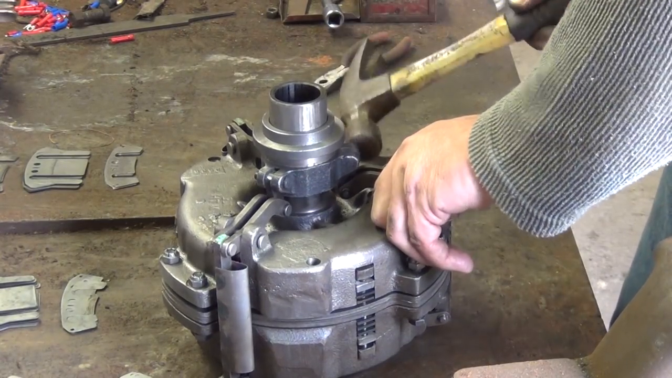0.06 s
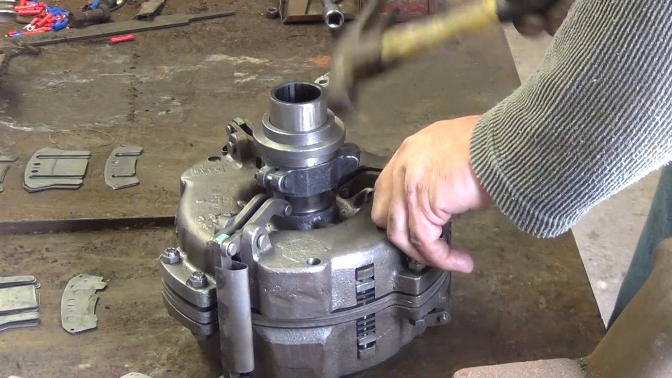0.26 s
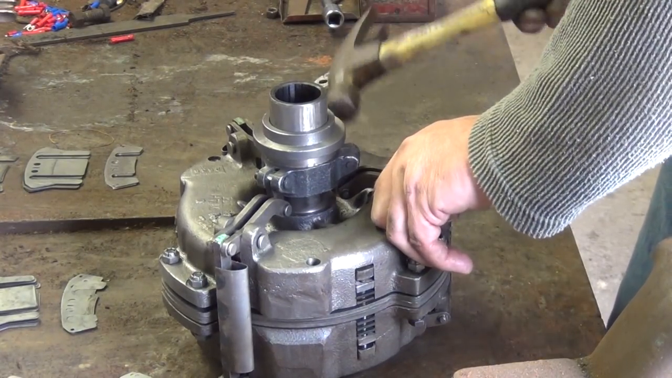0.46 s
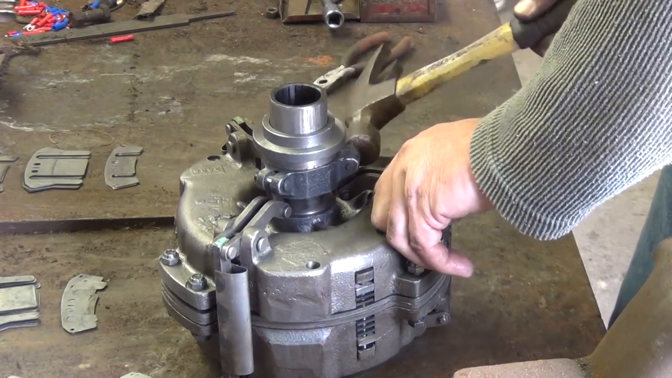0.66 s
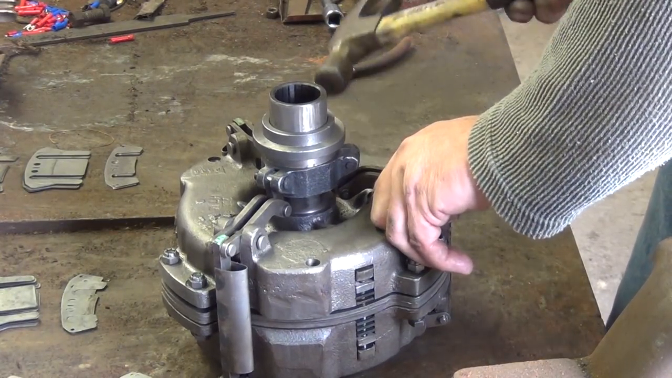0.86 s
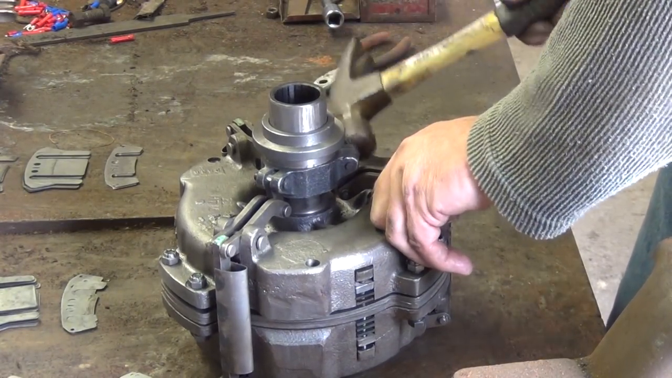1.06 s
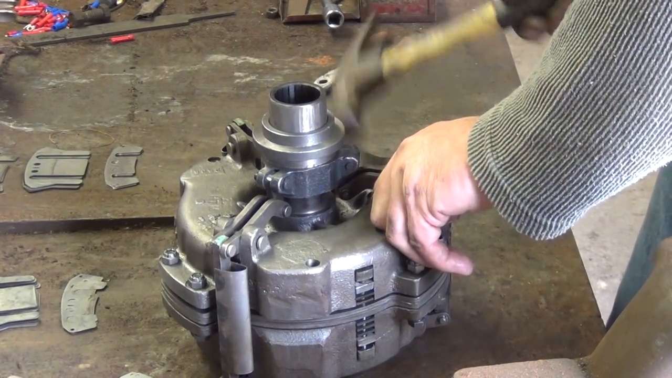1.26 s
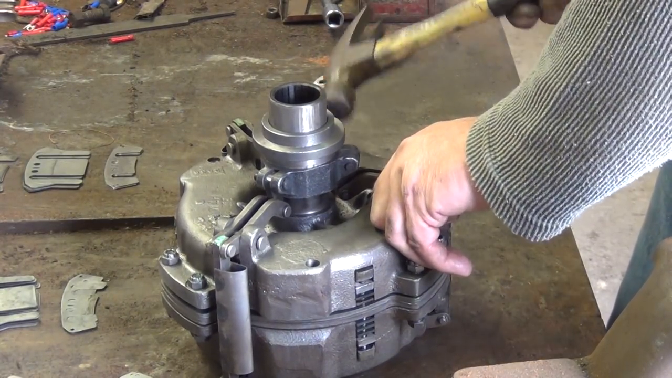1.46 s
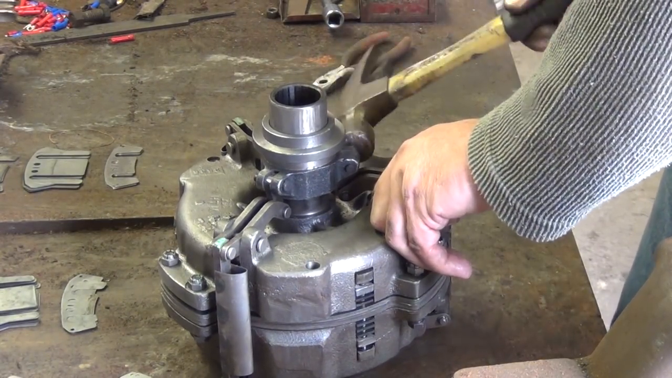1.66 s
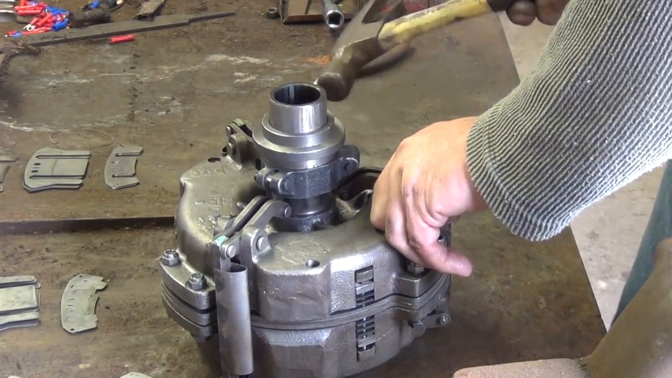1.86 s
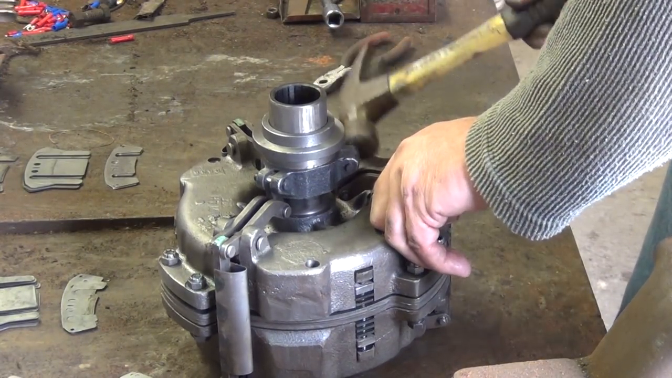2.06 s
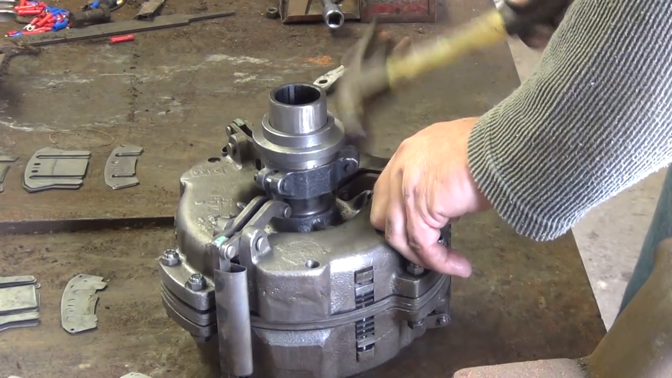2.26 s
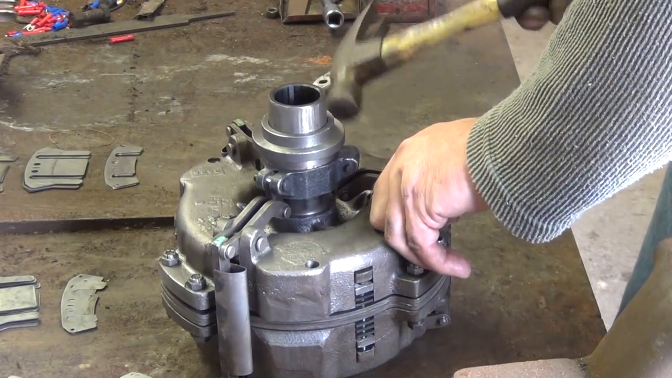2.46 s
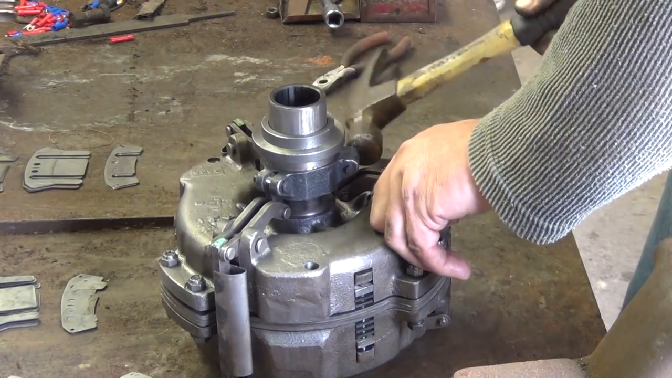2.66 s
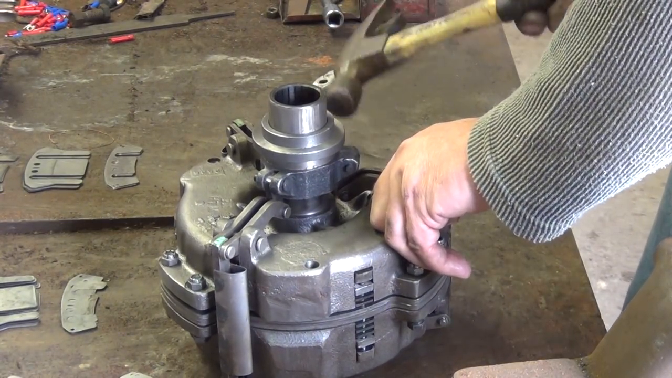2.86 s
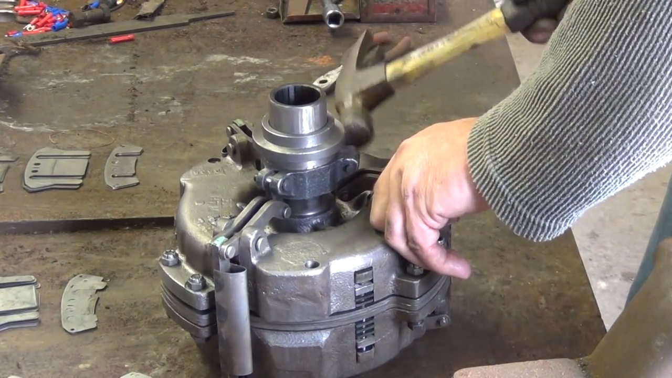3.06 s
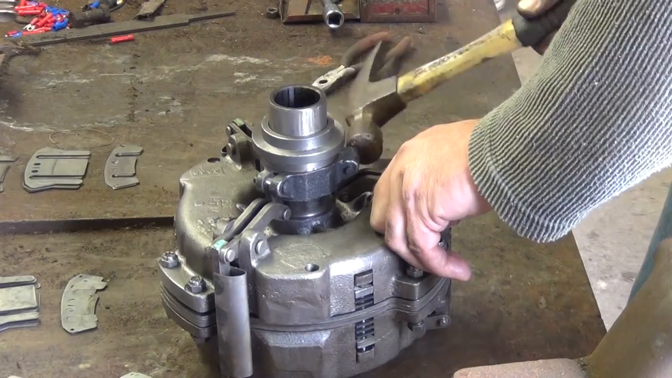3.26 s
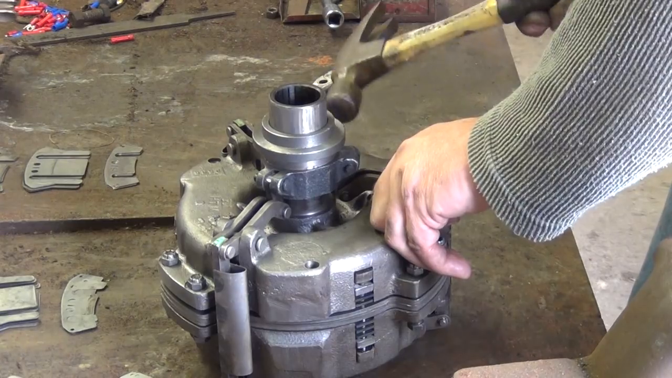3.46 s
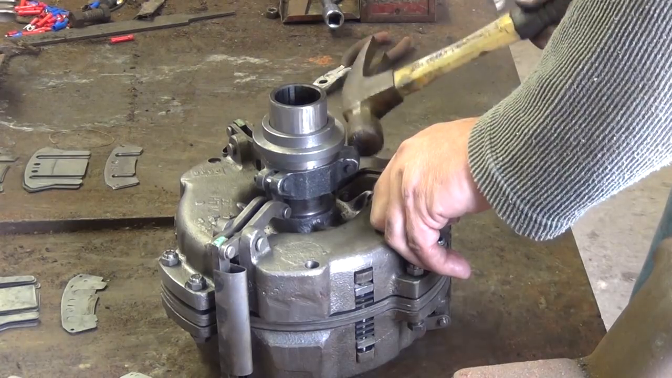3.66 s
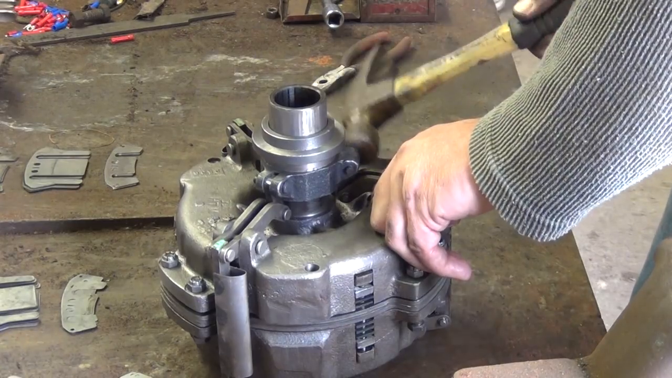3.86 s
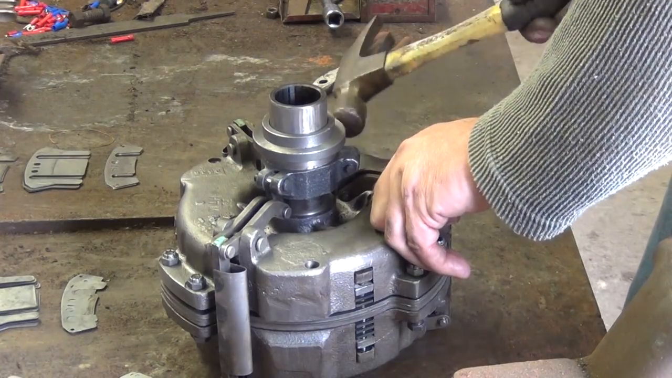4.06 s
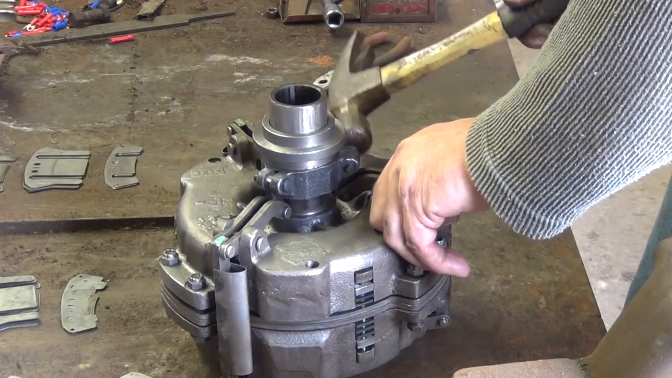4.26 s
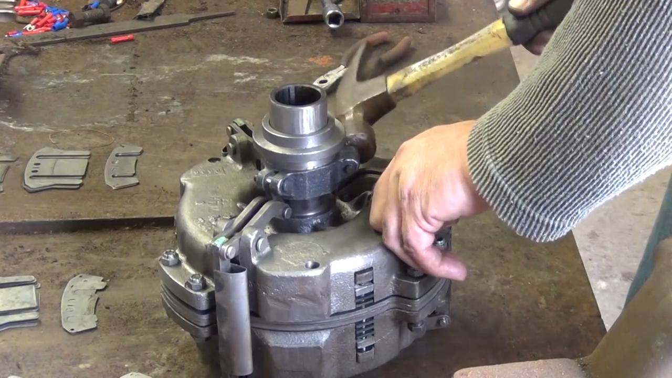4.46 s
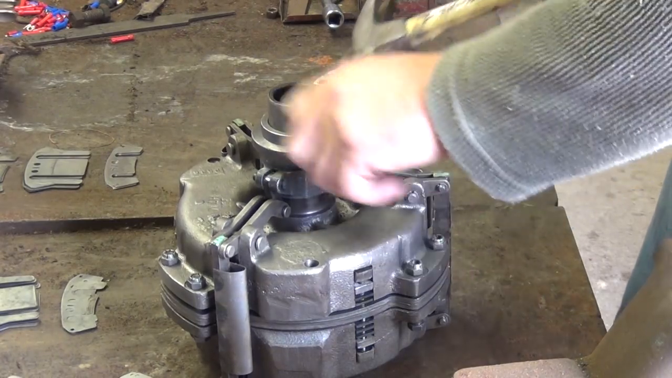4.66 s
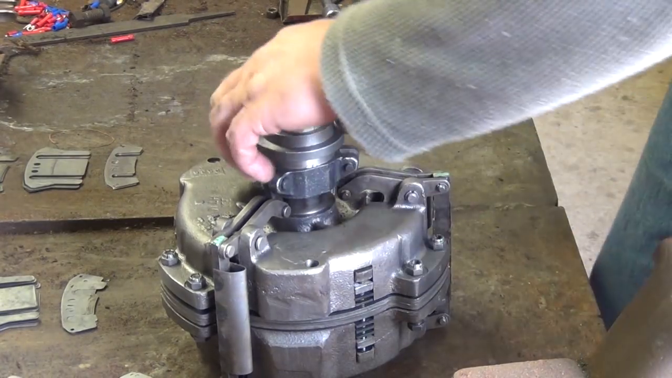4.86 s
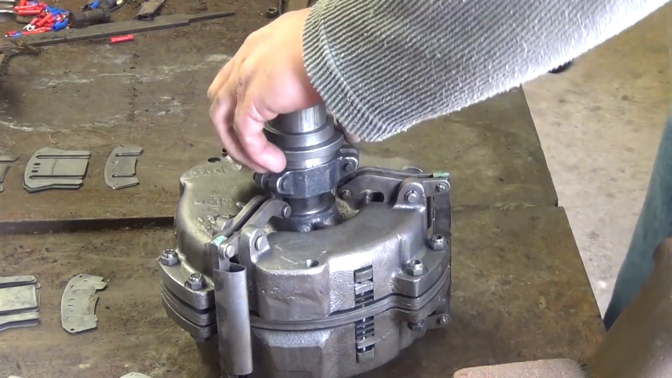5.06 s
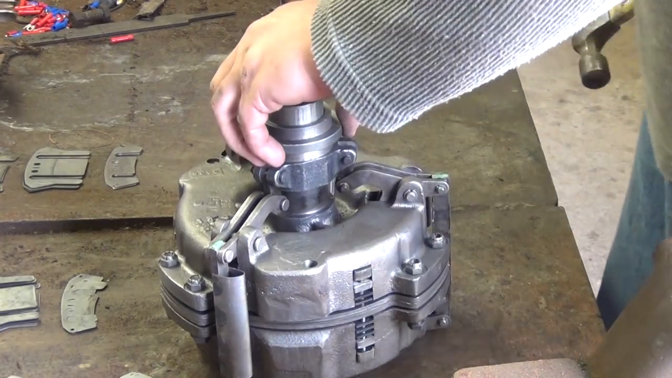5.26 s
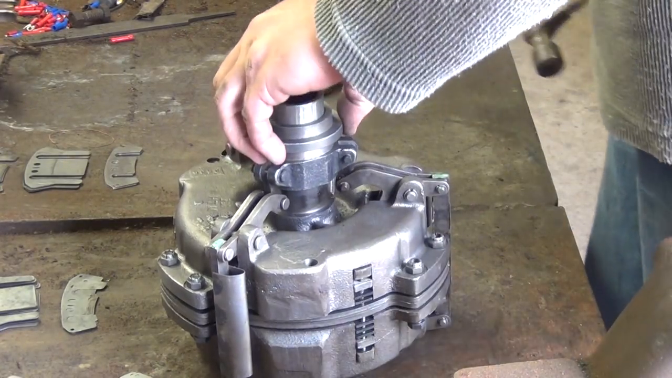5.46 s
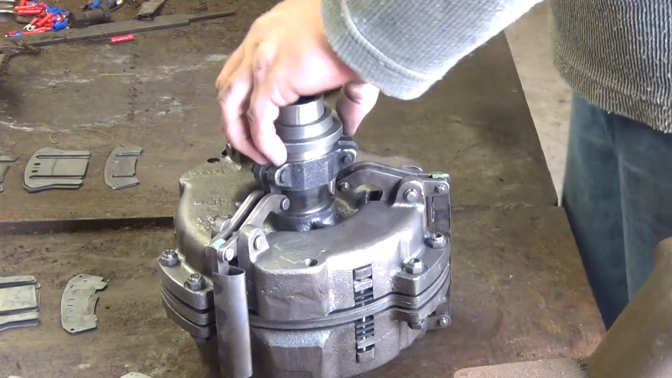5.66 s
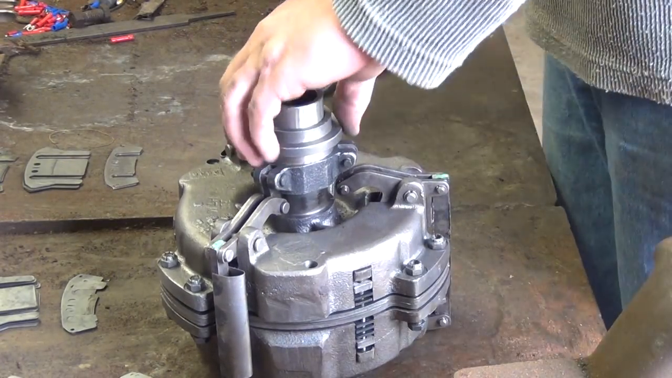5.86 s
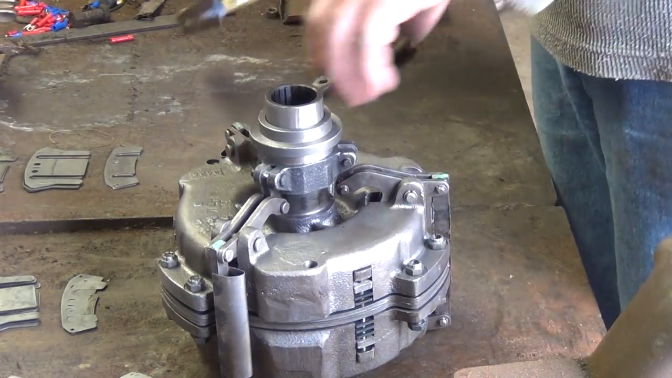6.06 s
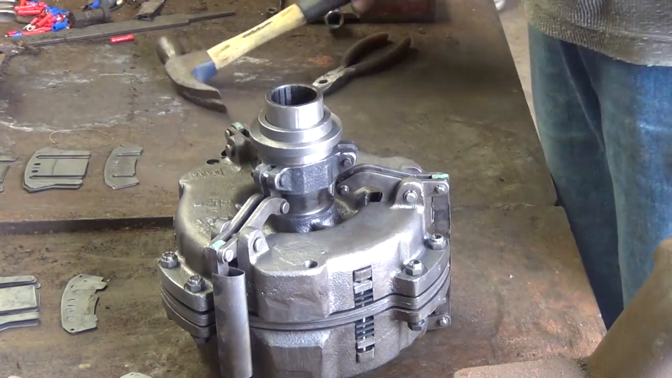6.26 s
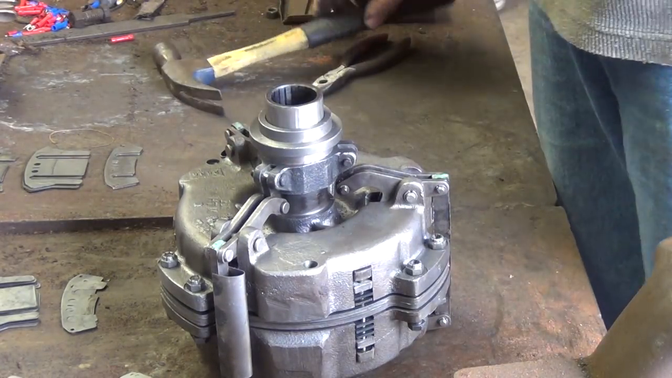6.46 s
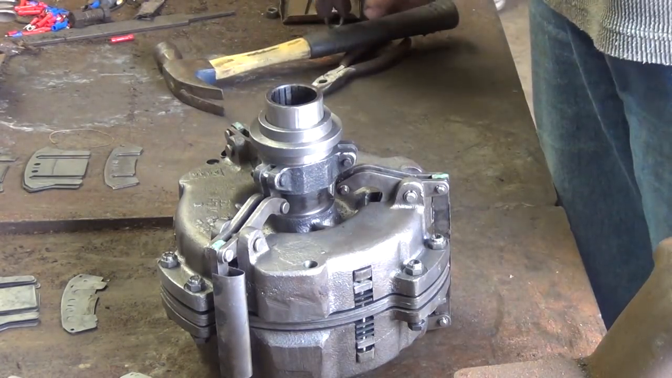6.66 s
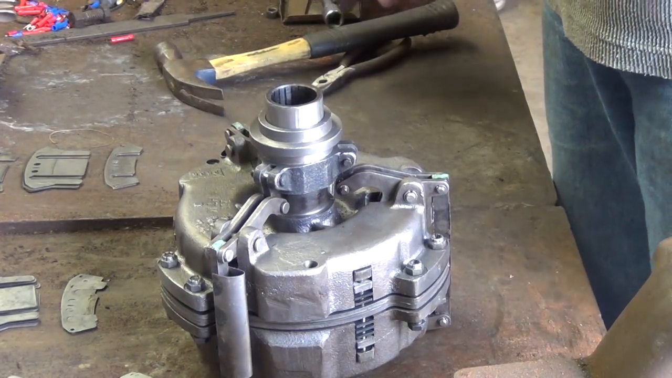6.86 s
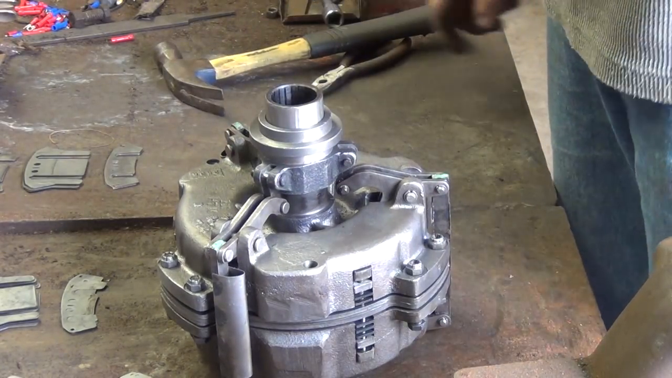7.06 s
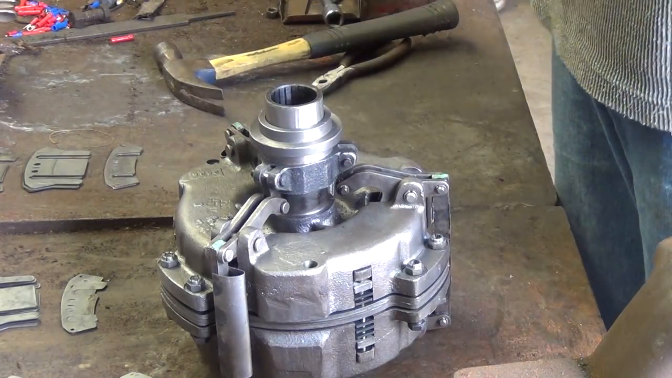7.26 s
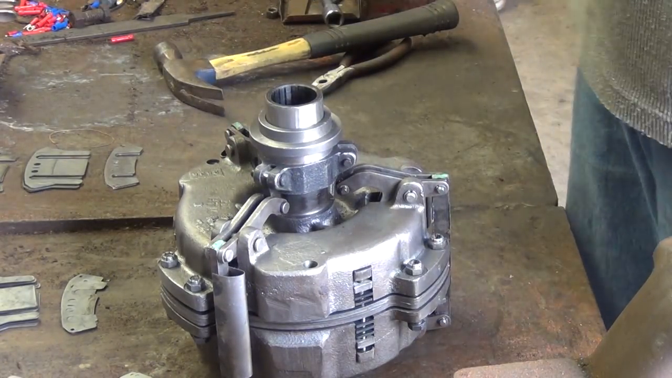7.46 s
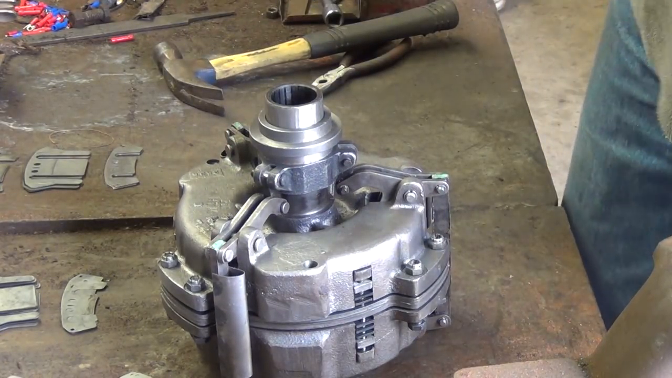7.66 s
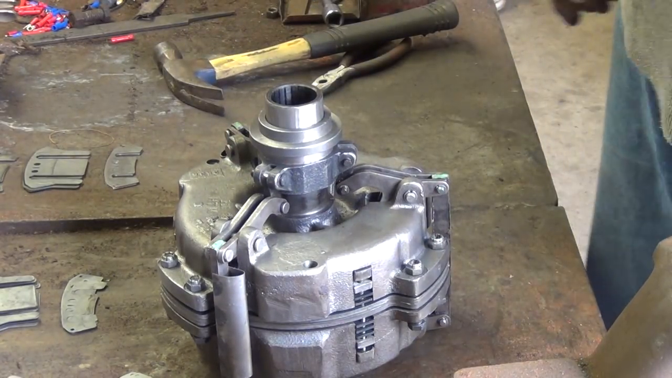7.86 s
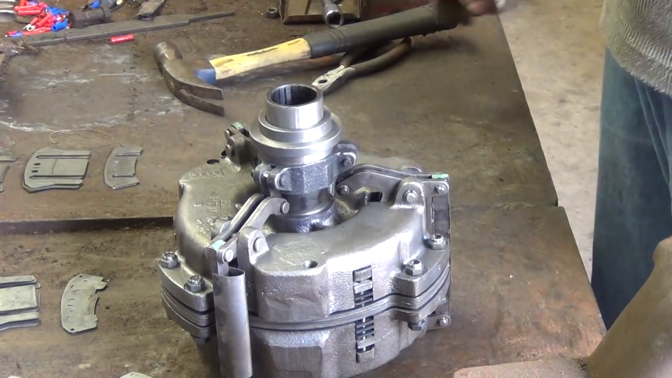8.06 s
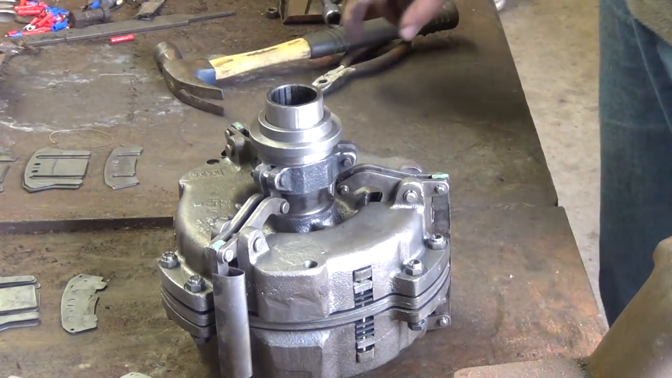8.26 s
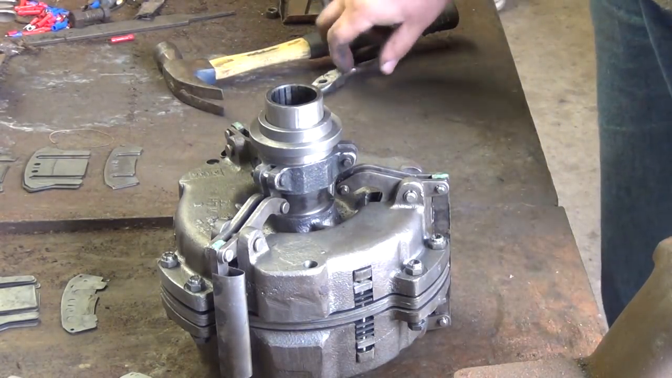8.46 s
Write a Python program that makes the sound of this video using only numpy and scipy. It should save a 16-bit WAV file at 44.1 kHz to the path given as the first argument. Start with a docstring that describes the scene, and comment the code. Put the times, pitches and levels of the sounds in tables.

```python
"""Close to a bench in a hard-walled workshop, a claw hammer taps a steel clutch about three times a second.
Each blow is a short crack plus ringing modes; most are followed by a rebound. The loose part thumps, then seats.
From five seconds a hand knocks hub and tools and clothes rustle; just after six the hammer is dropped on the
bench, and a low footstep follows near 7.87 s. The room answers all contacts with echoes and a diffuse tail,
over steady hiss from room and microphone. The recorder's gain control flattens the blows throughout."""
import sys
import numpy as np
from scipy import signal
from scipy.fft import rfft, irfft
from scipy.io import wavfile
from scipy.ndimage import uniform_filter1d

SR = 44100
rng = np.random.default_rng(int(sys.argv[2]) if len(sys.argv) > 2 else 0)


def undo_db(level):
    """Turn decibels back into plain size, where 20 dB means ten times bigger."""
    steps = np.asarray(level, float) / 20
    return 10 ** steps


def int16_out(signal):
    """Quantize to a 16-bit WAV file."""
    q = np.round(np.clip(np.atleast_2d(signal).T, -1, 1) * 32767)
    wavfile.write(sys.argv[1], SR, q.astype(np.int16))


N = 375732
SPOTS = 3   # contact places, each heard through its own room tail
PIVOT_HZ = 1800   # treble, bass and brightness tilt about this frequency

# spectrum of the crack of hammer taps and small knocks: f/Hz, relative level/dB
CRACK = [(35, -118), (60, -70), (294, -28.5), (767, -15), (946, -10), (1090, -7.5), (1380, -2.5), (1910, 1),
         (2250, -3.5), (4860, -8), (9790, -17.5), (14900, -31), (16000, -88.5)]
# broad, damped resonances of the casting: f/Hz, boost/dB at full share
CLANK = [(1330, 1), (1720, 3.5), (2800, 6.5), (3250, 4), (5000, 1.5), (6050, -1), (10400, 1.5)]


def rms_one(x):
    """Scale to unit rms."""
    return x / np.sqrt(np.mean(x ** 2) + 1e-20)


def at_hz(points, hz):
    """Read a table on a log-frequency axis."""
    table_hz, values = np.transpose(points)
    return np.interp(np.log(hz), np.log(table_hz), values)


def hammer_contacts():
    """Taps and rebounds as rows (s, strength, treble, bass, ring dB); thump gives way to ring as the part seats."""
    # hammer on clutch: t/s, blow strength/dB
    tap_times = [(.0044, -10.5), (0.3397, -6), (.673, -8), (1.0084, -8), (1.332, -7), (1.661, -7),
                 (1.9947, -10), (2.327, -11.5), (2.6512, -7.5), (2.9746, -4.5), (3.287, -4.5), (3.5949, -5),
                 (3.9031, -5.5), (4.1854, -8.5), (4.4456, -11)]
    # the head bounces and lands once more, some 30 ms after a tap: t/s, blow strength/dB
    rebound_times = [(0.0371, -8.5), (0.3701, -9), (0.7029, -7), (1.038, -8), (1.3609, -7.5),
                     (1.6892, -13.5), (2.0246, -9.5), (2.3554, -4), (2.678, 0), (3.002, -4.5), (3.314, -2),
                     (3.6198, -6), (3.928, -8)]
    tap_treble_db, rebound_treble_db, rebound_ring_db = 2, 3, -8.5
    loose_bass_db, seated_bass_db, loose_ring_db = 10, -1.5, -1.5
    seats_at_s, seating_s = 2.61, 0.17
    rows = [(s, db, tap_treble_db, 0) for s, db in tap_times]
    rows += [(s, db, rebound_treble_db, rebound_ring_db) for s, db in rebound_times]
    s, db, treble, ring = np.transpose(sorted(rows))
    loose = 1 / (1 + np.exp((s - seats_at_s) / seating_s))
    # a loose part thumps the bench, a seated one rings louder
    bass = seated_bass_db * (1 - loose) + loose_bass_db * loose
    return np.transpose([s, db, treble, bass, ring + loose_ring_db * loose])


def hammer_taps():
    """The clutch takes each blow as a steel crack and rings long in narrow modes."""
    # modes of the clutch: f/Hz, relative level/dB
    clutch = [(1285, -26), (1400, 2), (1560, -36), (1627, -5), (1715, -2), (1870, -3), (1975, -6.5),
              (2140, 5), (2370, 10), (2515, -9), (2606, 0), (2650, 8), (2760, -8), (3058, -2.5),
              (3170, -7.5), (3219, 4.5), (3785, 5), (3892, -45.5), (4262, -17.5), (4910, -28),
              (4985, -16.5), (5943, -18), (6035, 8.5), (6948, 7.5), (9562, -2.5), (10170, -15.5),
              (10420, 2.5)]
    return blows(hammer_contacts(), CRACK, clutch, body_db=20, ring_db=-46.5, crack_s=.0016,
                 cycles=500, clank=CLANK)


def hammer_drop():
    """The dropped hammer thuds on the bench, whose few modes die quickly; strong echoes sound the same way."""
    # landings on the bench and strong 17 ms room echoes of the drop (6.308 s) and of a metal clack (6.5905 s):
    # t/s, blow strength/dB, treble/dB, bass/dB, ring/dB
    thuds_and_echoes = [(6.2912, -9, -0.5, -5, -7), (6.308, -5.5, -0.5, -3.5, -2.5),
                        (6.3905, -5, 0.5, -13.5, -3.5), (6.403, -8.5, 1.5, -9.5, -7.5),
                        (6.5905, -19, -17, -3.5, -4)]
    # spectrum of the thud: f/Hz, relative level/dB
    thud = [(35, -65), (60, -36), (130, -47), (274, -24), (315, -1.5), (607, 3), (715, 6.5), (968, -4.5),
            (1140, 5.5), (1950, -0.5), (3940, -8.5), (9130, -39.5), (16000, -76)]
    # modes of the bench: f/Hz, relative level/dB
    bench = [(727, -40), (1163, -26), (1459, 11), (1960, 21.5), (2143, -10), (3391, -24), (4700, 7)]
    return blows(thuds_and_echoes, thud, bench, body_db=15, ring_db=-37.5, crack_s=0.0059, cycles=45)


def knocks_and_footstep():
    """Small knocks of hub and tools, and a low footstep; soft contacts ring more than they click."""
    # small knocks, and a bass-heavy footstep at 7.868 s: t/s, blow strength/dB, treble/dB, bass/dB
    touches = [(5.164, -37.5, -24, -5), (5.184, -33.5, -11, 15), (5.337, -49, -3, 6),
               (5.479, -34.5, -13, -2), (5.545, -57, -20, 2.1), (5.628, -44.5, -40, 8),
               (5.696, -42, -15, 7), (5.797, -36, -11, 15), (5.914, -41.5, 6, 5), (6.035, -43, -9, -5),
               (6.574, -18, 8.5, 2), (6.642, -37, 14, .1), (6.944, -28.5, -5, -12), (6.953, -29.5, 3, -13),
               (7.096, -29, -11, 3), (7.868, -39.5, 3, 29), (8.45, -43, -4.5, -1), (8.462, -44, 1, -5),
               (8.485, -46, -10, -10)]
    # modes of the loose hub: f/Hz, relative level/dB
    hub = [(310, -10), (640, -2.5), (720, -2), (1300, -2.5), (1780, 3), (2700, -14), (3400, -28),
           (4500, 0.5)]
    ring_per_dull = .2   # dB of ring per dB of lost treble
    contacts = [(s, db, treble, bass, -ring_per_dull * treble) for s, db, treble, bass in touches]
    return blows(contacts, CRACK, hub, body_db=9.5, ring_db=-29, crack_s=0.0029, cycles=35, clank=CLANK)


def blows(events, colour, modes, body_db, ring_db, crack_s, cycles, clank=()):
    """Each contact is a broadband crack that also sets modes ringing; dealt over the spots."""
    rows = np.array(events)
    at = (rows[:, 0] * SR).astype(int)
    cracks = smeared_cracks(rows, at, colour, body_db, crack_s, clank)
    return cracks + ringing_modes(rows, at, modes, body_db + ring_db, cycles)


def smeared_cracks(rows, at, colour, body_db, crack_s, clank):
    """A minimum-phase click of the contact's colour, smeared by waves running about in the part."""
    size = 4096
    hz = np.arange(size // 2 + 1) * SR / size + 1
    octaves = np.log2(hz / PIVOT_HZ)
    out = np.zeros((SPOTS, N + size))
    lags_s = crack_s * rng.uniform(0.152, .6, (len(at), 3, 1))
    shares = rng.uniform(0.027, 0.87, (len(at), len(clank)))   # every blow lands a little elsewhere
    for k, (i, (_, db, treble_db, bass_db, _)) in enumerate(zip(at, rows)):
        # a harder contact lifts the treble, a heavier one the bass
        treble = treble_db * np.clip(octaves / 2, 0, 1.6)
        bass = bass_db * np.clip(-octaves / 2, 0, 1.8)
        shape_db = at_hz(colour, hz) + treble + bass
        for (peak_hz, peak_db), share in zip(clank, shares[k]):
            shape_db = shape_db + share * peak_db * np.exp(-.5 * (np.log2(hz / peak_hz) / 0.12) ** 2)
        # folding the cepstrum makes the click causal
        cepstrum = irfft(np.log(undo_db(shape_db)))
        cepstrum[1:size // 2] *= 2
        cepstrum[size // 2 + 1:] = 0
        # three recirculating delays smear the click and ripple its spectrum
        turn = np.exp(-2j * np.pi * hz * lags_s[k])
        smear = np.prod((turn - .72) / (1 - 0.82 * turn), axis=0)
        crack = irfft(np.exp(rfft(cepstrum)) * smear)
        out[k % SPOTS, i:i + size] += undo_db(db + body_db) * crack / np.sqrt(np.sum(crack ** 2))
    return out[:, :N]


def ringing_modes(rows, at, modes, gain_db, cycles):
    """Two-pole resonators, dying by 60 dB in a fixed count of cycles; each blow strikes each one differently."""
    _, db, treble_db, _, ring_db = rows.T
    out = np.zeros((SPOTS, N))
    chances_db = 1.7 * rng.standard_normal((len(modes), len(at)))
    for k, ((mode_hz, mode_db), chance_db) in enumerate(zip(modes, chances_db)):
        treble = treble_db * np.clip(np.log2(mode_hz / PIVOT_HZ) / 2, 0, 1.5)
        clicks = np.full(N, 1e-18)   # a trace of input keeps the filter out of denormals
        clicks[at] = undo_db(db + ring_db + treble + gain_db + mode_db + chance_db)
        r = undo_db(-60 * mode_hz / (cycles * SR))
        w = 2 * np.pi * mode_hz / SR
        out[k % SPOTS] += signal.lfilter([0, np.sin(w)], [1, -2 * r * np.cos(w), r * r], clicks)
    return out


def noise_bands(size):
    """Half-octave bands of stereo noise whose left and right agree by band: (centre Hz, band)."""
    # how alike the two sides are: f/Hz, left-right correlation (0-1)
    likeness = [(60, 1), (150, 1), (380, 1), (950, 0.96), (2380, 0.87), (5980, 0.66), (15000, 0.91)]
    borders_hz = 30 * 2 ** np.arange(0, 9.4, .5)
    white = rng.standard_normal((2, 2, size))   # neighbouring bands use separate noise
    for k, (low, high) in enumerate(zip(borders_hz, borders_hz[1:])):
        band_pass = signal.butter(2, [low, high], "band", fs=SR, output="sos")
        mid, side = signal.sosfilt(band_pass, white[k % 2])
        hz = np.sqrt(low * high)
        alike = at_hz(likeness, hz)
        yield hz, np.sqrt(1 + alike) * mid + np.sqrt(1 - alike) * side * [[1], [-1]]


def workshop(x):
    """Direct sound, dull wall echoes and a diffuse tail that builds up and dies band by band."""
    # time for the tail to fall by 60 dB: f/Hz, t/s
    room_t60 = [(100, 0.77), (260, 0.76), (700, 0.72), (1840, 0.65), (4850, 0.53), (12800, 0.23)]
    # echoes off the walls: delay/s, level/dB, low-pass corner f/Hz
    echoes = [(0.0175, -1.5, 3900), (0.0253, -15, 3883), (0.046, -9.5, 4000)]
    tail_db, tail_rise_s, lumpy_db, smooth_by_s = -0.5, 0.0089, 8, 0.039
    direct_low_hz, direct_db = 760, -0.5
    t = np.arange(SR) / SR
    tail = sum(band * undo_db(-60 * t / at_hz(room_t60, hz)) for hz, band in noise_bands(SR))
    # early reflections arrive in clumps, later ones merge
    lumps = rms_one(uniform_filter1d(rng.standard_normal(SR), size=130))
    tail = tail * (1 - np.exp(-t / tail_rise_s)) * undo_db(lumpy_db * lumps * np.exp(-t / smooth_by_s))
    response = undo_db(tail_db) * tail / np.sqrt(np.sum(tail ** 2) / 2)
    for delay_s, db, top_hz in echoes:
        r = np.exp(-2 * np.pi * top_hz / SR)
        i = int(delay_s * SR)
        response[:, i:i + 64] += undo_db(db) * (1 - r) * r ** np.arange(64)
    # a small part radiates little bass straight; the lows bloom through bench and room
    bass_cut = signal.butter(2, direct_low_hz, "high", fs=SR)
    response[:, :512] += undo_db(direct_db) * signal.lfilter(*bass_cut, np.arange(512) == 0)
    return signal.fftconvolve(np.atleast_2d(x), response, axes=1)[:, :N]


def cloth_rustle():
    """Grainy cloth noise that swells, holds and fades with each movement of hands, sleeves and feet."""
    # movements: start t/s, length/s, level/dB, brightness/(dB per octave)
    moves = [(5.04, .06, -57, 1.5), (5.16, .05, -52, -2.1), (5.33, .05, -58, -1.1), (5.54, .1, -61, -2.5),
             (5.72, .12, -55, .8), (5.87, .2, -51, 2.2), (6.12, .15, -55, 2.5), (6.8, .2, -53, 2.5),
             (7.09, .045, -41, 1.8), (7.43, .05, -62, -1.1), (7.67, .11, -60, 4.5), (7.86, .04, -51, 0),
             (8.44, .1, -57, -1.1)]
    # spectrum of cloth: f/Hz, relative level/dB
    cloth_colour = [(35, -64), (60, -78), (515, -4.5), (566, -16.5), (682, -16.5), (1860, -12), (7570, -27),
                    (13600, -63), (16000, -73)]
    swell_db, fall_db_per_s, grain_db = 11, 160, 1.6
    start, length, move_db, bright = np.transpose(moves)[:, :, None]
    t = np.arange(0, N + 64, 64) / SR
    # swell_db in the time of one length, up to the middle; fade after the end
    swell = swell_db * np.maximum(start + length / 2 - t, 0) / length
    fade = fall_db_per_s * np.maximum(t - start - length, 0)
    shape_db = move_db - swell - fade
    grain = undo_db(grain_db * rms_one(uniform_filter1d(rng.standard_normal(N), size=200)))
    cloth, power = 0, 0
    for hz, band in noise_bands(N):
        tilt_db = bright * np.log2(hz / PIVOT_HZ)
        envelope = np.sqrt(np.sum(undo_db(2 * (shape_db + tilt_db)), axis=0))
        coloured = band * undo_db(at_hz(cloth_colour, hz))
        cloth = cloth + coloured * np.interp(np.arange(N) / SR, t, envelope)
        power += np.mean(coloured ** 2)
    return grain * cloth / np.sqrt(power)


def room_and_mic_hiss():
    """The steady noise floor of room and microphone, as coloured noise."""
    # spectrum of the hiss: f/Hz, relative level/dB
    hiss_colour = [(15, -48), (25, -18), (266, -26), (475, -14), (542, -22), (651, -2), (783, -16),
                   (847, -2), (917, -10), (7510, -30), (13400, -26)]
    hiss_db = -63
    return undo_db(hiss_db) * rms_one(sum(band * undo_db(at_hz(hiss_colour, hz)) for hz, band in noise_bands(N)))


def without_top(x):
    """A steep low-pass, 50 dB down from 14.3 kHz, takes the top off the quiet noises."""
    return signal.sosfilt(signal.cheby2(10, 50, 14300, fs=SR, output="sos"), x)


def scene():
    """Everything struck sounds through the room; rustle and hiss reach the microphone without it."""
    knock_near_db, drop_near_db = 5.5, 4.5
    taps, fall, knocks = hammer_taps(), hammer_drop(), knocks_and_footstep()
    # the bench carries these straight across
    near = undo_db(knock_near_db) * knocks.sum(axis=0) + undo_db(drop_near_db) * fall.sum(axis=0)
    room = sum(workshop(spot) for spot in taps + fall + knocks)
    return room + near + without_top(cloth_rustle() + room_and_mic_hiss())


def band_limit(x):
    """A steep low-pass at the top of the band."""
    return signal.sosfilt(signal.butter(12, 16810, fs=SR, output="sos"), x)


def record(dry):
    """Two gain-control stages duck on loud sound and recover steadily; peaks are rounded, deep bass cut."""
    # slow stage, then fast: ceiling level/dB, squeeze (0-1), smoothing/s, release of held excess/(dB per s)
    stages = [(-30.5, 0.38, 0.021, 25), (-17.5, 0.79, 0.00037, 463.5)]
    peak_top, mic_low_hz = .5, 120
    x = dry
    for ceiling_db, squeeze, attack_s, release in stages:
        power = signal.lfilter([.02], [1, -.98], np.mean(x ** 2, axis=0))
        over_db = np.maximum(10 * np.log10(power + 1e-12) - ceiling_db, 0)
        # a running maximum on a rising ramp holds each peak and lets it fall at the release rate
        ramp = release * np.arange(N) / SR
        held_db = np.maximum.accumulate(over_db + ramp) - ramp
        r = np.exp(-1 / (attack_s * SR))
        x = x * undo_db(-signal.lfilter([1 - r], [1, -r], squeeze * held_db))
    rounded = peak_top * np.tanh(x / peak_top)
    mix = signal.sosfilt(signal.butter(2, mic_low_hz, "high", fs=SR, output="sos"), rounded)
    return band_limit(mix)


dry = scene()
out = record(dry)
int16_out(out)
```